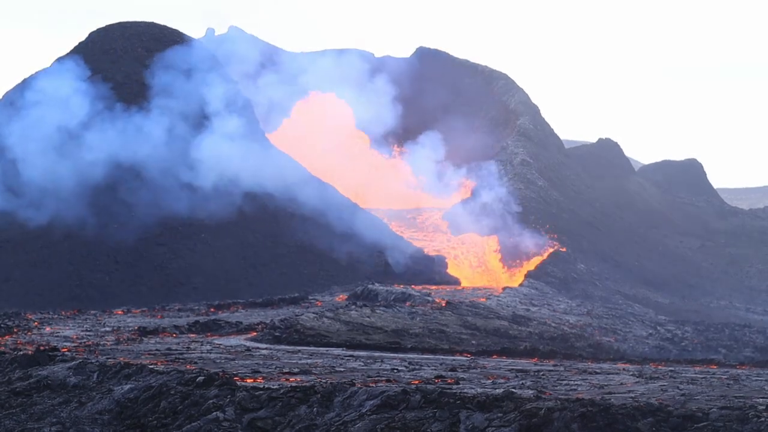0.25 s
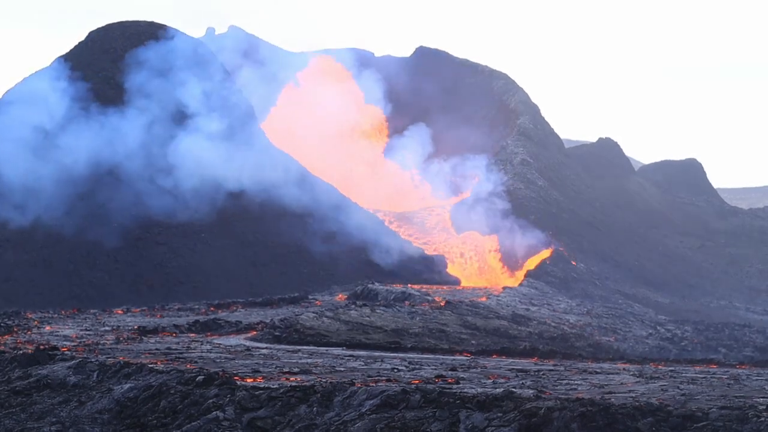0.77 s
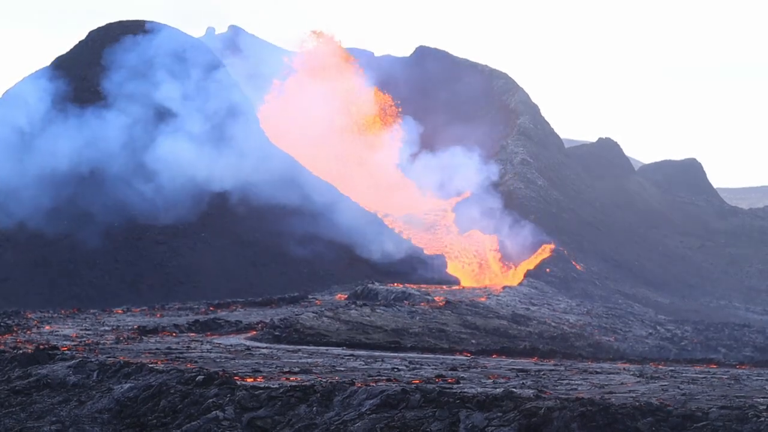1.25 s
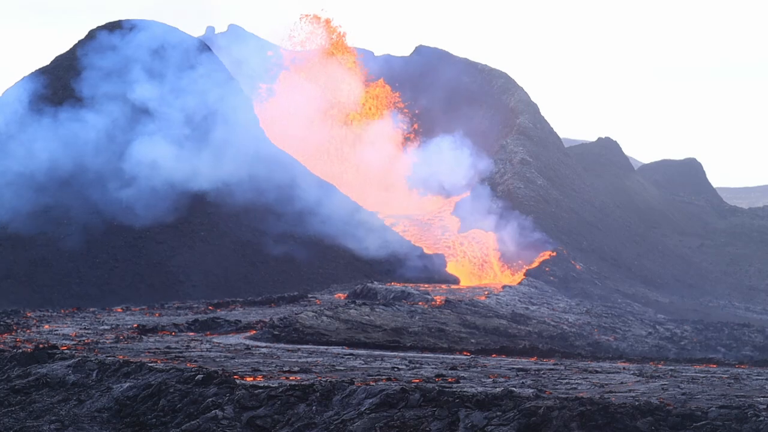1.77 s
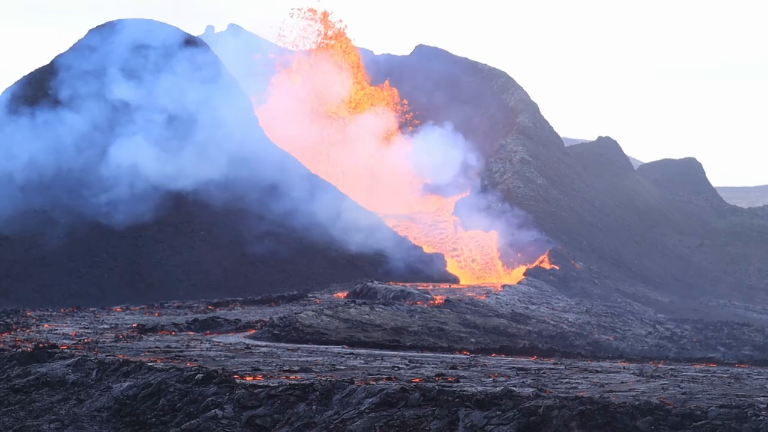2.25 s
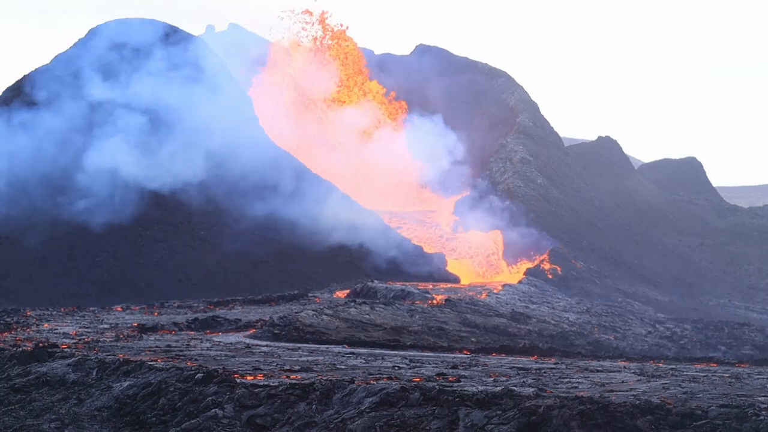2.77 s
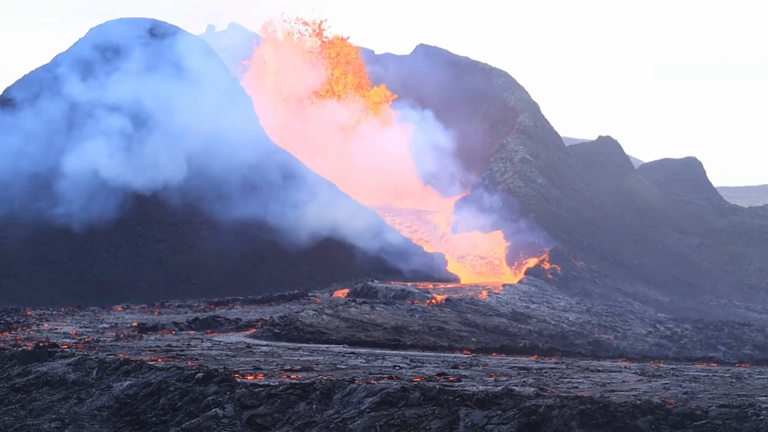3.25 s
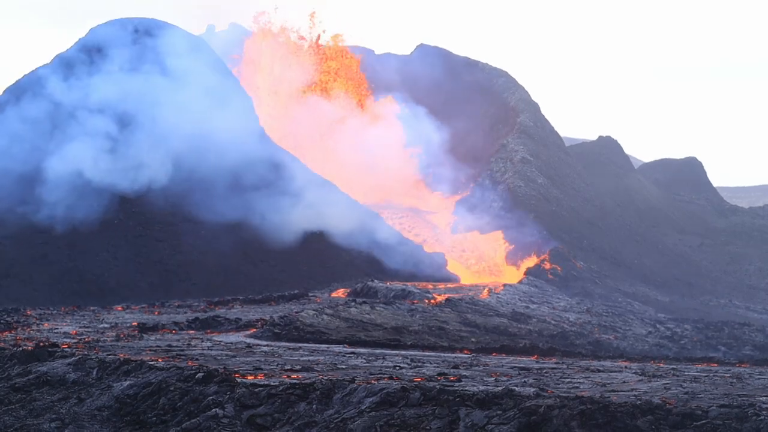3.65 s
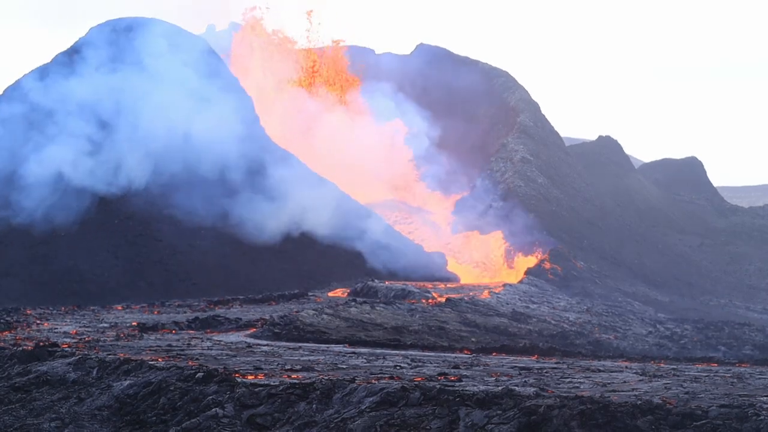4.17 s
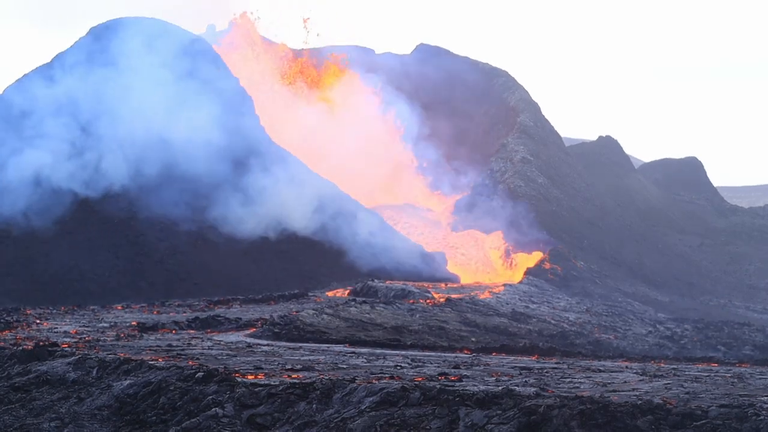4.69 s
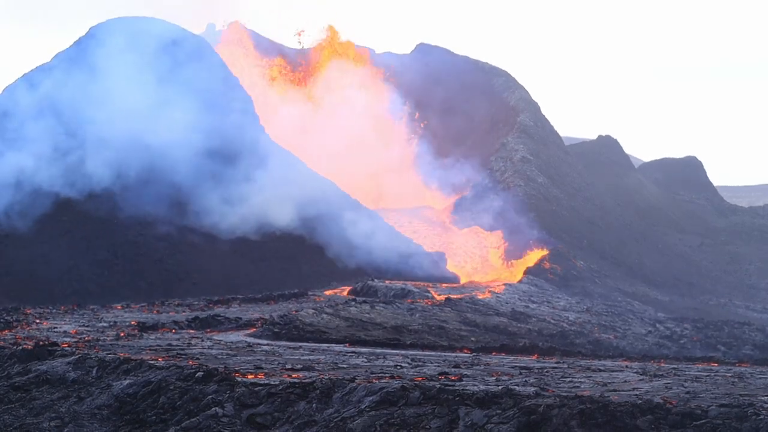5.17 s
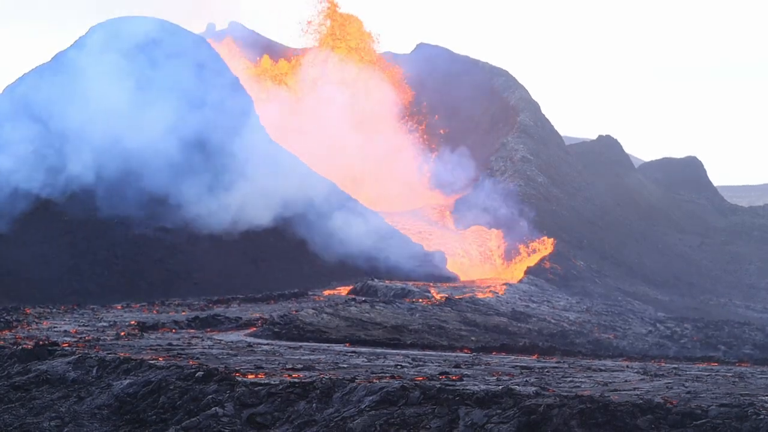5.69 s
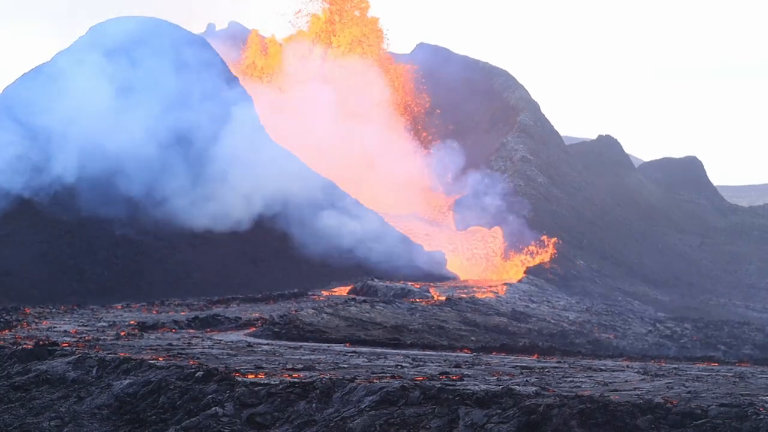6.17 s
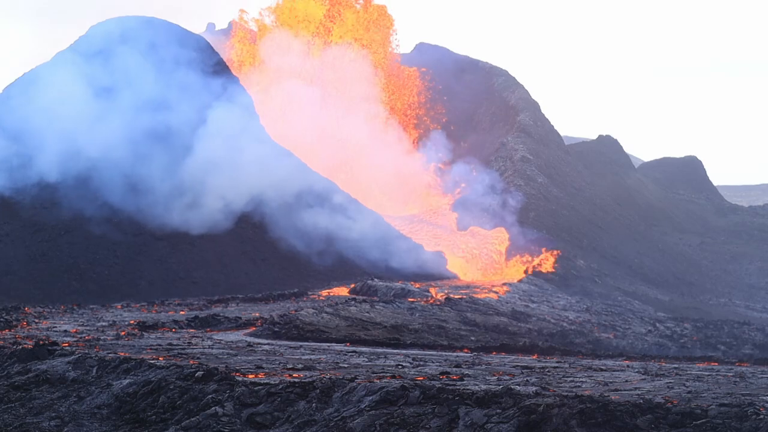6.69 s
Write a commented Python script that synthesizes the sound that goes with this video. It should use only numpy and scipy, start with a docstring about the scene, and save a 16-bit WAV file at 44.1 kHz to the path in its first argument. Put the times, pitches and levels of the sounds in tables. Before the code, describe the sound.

A distant lava fountain booms and rushes outdoors, swelling from quiet to a full steady roar, with early wind buffets and a few near knocks.

```python
"""Distant lava fountain in wind

The gas jet booms and rushes, swelling and then holding; falling clots patter into a dull wash.
All are shaped noise under level curves, with soft low tones added over the boom. Wind noise buffets
the microphone, a thin treble hiss lies on top, and ticks and knocks made of close partials sound nearer.
"""
import sys
import numpy as np
from scipy import signal
from scipy.fft import rfft, irfft, next_fast_len
from scipy.io import wavfile
from scipy.ndimage import uniform_filter1d, map_coordinates

SR = 44100
rng = np.random.default_rng(int(sys.argv[2]) if len(sys.argv) > 2 else 0)


def master(y):
    """Save y as 16-bit WAV."""
    cut = np.clip(np.atleast_2d(y).T, -1, 1)
    pcm = np.round(cut * 32767)  # scale
    wavfile.write(sys.argv[1], SR, pcm.astype(np.int16))


N = 306054  # samples

# Spectra, relative level per Hz: freq_hz, level_db
RUMBLE_SPECTRUM = [(25, -30.5), (45, -11.5), (65, 1), (95, 2.5), (125, -7), (170, -19), (300, -66.5)]
RUSH_SPECTRUM = [(150, -20), (280, -4), (370, 0), (480, -2), (600, -2), (800, -1), (1000, -5.5),
                 (1250, -12.5), (1800, -18), (3000, -46)]
SPATTER_SPECTRUM = [(600, -31), (1100, -4.5), (1700, -5.5), (2100, -9.5), (2800, -13), (3500, -21.5),
                    (4500, -35), (7000, -77)]
SPRAY_SPECTRUM = [(1500, -21), (2800, -13), (3700, -4), (5000, -13), (6500, -30.5), (9000, -50)]
BUFFET_SPECTRUM = [(10, -26), (24, -1), (33, -0.5), (42, 2), (52, 0), (62, -4), (90, -8), (150, -28),
                   (300, -58.5)]
HISS_SPECTRUM = [(2000, -33), (5000, -0.5), (7500, -6), (10000, -7.5), (13000, -9), (16000, -9)]
# Boom spectrum at the middle pitch, before the shift to either band: freq_hz, level_db
BOOM_SPECTRUM = [(60, -34), (100, -11.5), (140, -1.5), (170, 1), (205, -1.5), (260, -10), (400, -30),
                 (800, -64)]

# Fountain levels before short rises and tearing: time_s, rush_db, boom_db, spatter_db, spray_db
JET_LEVELS = [(0, -31.5, -27, -39.5, -61), (.45, -32, -29.5, -43, -62.5), (.95, -33, -31, -42, -59.5),
              (1.6, -28, -28, -37.5, -55), (2.15, -24, -23, -33, -51), (2.55, -21, -16, -31.5, -51),
              (2.75, -20.5, -16, -33, -52.5), (3.0, -21, -17.5, -32.5, -52.5),
              (3.35, -21, -17.5, -33, -52.5), (3.7, -21, -17.5, -34, -52), (4.0, -20, -17, -30.5, -53.5),
              (4.36, -18, -18, -32.5, -56), (4.5, -20, -18, -32, -58), (4.8, -18, -19.5, -31.5, -57),
              (5.15, -17, -18, -31, -56), (5.35, -15.5, -15.5, -27.5, -55), (5.55, -17, -16.5, -27, -56),
              (5.79, -16, -17, -28, -53.5), (5.84, -19, -17.5, -28, -55), (5.92, -17, -19, -30, -55),
              (5.98, -20, -15, -32.5, -56.5), (6.3, -20.5, -20.5, -33, -59.5), (6.55, -20, -20, -32, -59),
              (6.9, -20, -18.5, -34, -58)]
# Short rises in the jet, some slight or none, before each layer's share: time_s, rise_db, sigma_s
JET_RISES = [(2.55, 0.5, 0.03), (4.28, 2, .03), (4.4, 3, 0.066), (4.74, 1, .03), (5.32, 0, 0.044),
             (5.78, 2, 0.012), (5.93, 2.5, 0.015), (6.5, 1, .01)]
# Share of a short rise in each layer: rush_ratio, boom_ratio, spatter_ratio, spray_ratio
JET_RISE_SHARES = [0.56, .6, 0.81, 1.1]
# Quick tearing depth: rush_db, spatter_db, spray_db
TEAR_DEPTHS_DB = [0.57, 0.5, 0.5]
# Deep heaves of the vent that lift the rumble: time_s, rise_db, sigma_s
HEAVES = [(2.32, 4.5, 0.033), (3.85, 9.5, 0.04), (4.04, 4, 0.056), (4.94, 7.5, 0.16), (5.5, 4, 0.17),
          (5.9, 5, 0.05), (6.15, 9, 0.11), (6.4, 11.5, .06), (6.65, 3.5, 0.08), (6.83, 6.5, 0.077)]
# Thumps that roll through the boom: time_s, rise_db, sigma_s
THUMPS = [(2.86, 2, 0.033), (4.28, 2, .03), (4.74, 5, 0.026), (5.0, 2, .03), (5.33, 2.5, 0.023),
          (5.72, 1, .04), (5.96, 3, 0.021), (6.07, -0.5, .03), (6.24, 4.5, 0.023), (6.41, 3.5, .02),
          (6.5, 2, 0.018), (6.69, 3.5, 0.053)]
# Boom pitch drift as the vent mouth opens and chokes: time_s, upper_band_power_share (0-1)
BOOM_DRIFT = [(0, 0.54), (2.2, 0.47), (2.55, 0.87), (2.9, 0.8), (3.1, 0.3), (3.3, 0.8), (3.55, .85),
              (3.7, 0.2), (4.05, 0.53), (4.3, 0.6), (4.7, 0.56), (5.0, .4), (5.3, 0.75), (5.7, 0.57),
              (6.05, 0.32), (6.4, 0.23), (6.6, 0.6), (6.94, 0.4)]
# Soft low sine swells added over the boom noise: time_s, peak_db, pitch_hz, sigma_s
THROBS = [(2.547, -16.5, 215, 0.022), (2.68, -14.5, 195.3, .03), (2.727, -17, 125, .025),
          (3.102, -13.5, 140, 0.033), (3.212, -13.5, 175, 0.027), (3.358, -14, 154.8, 0.024),
          (3.527, -18, 210, 0.027), (3.66, -17, 136, 0.033), (3.802, -12, 150, 0.024),
          (4.41, -13, 175, .03)]

# Brief swells of low wind noise: time_s, peak_db, sigma_s
WIND_SWELLS = [(0.03, -29, 0.054), (0.17, -28, 0.015), (0.238, -27, 0.011), (0.32, -34, 0.031),
               (0.403, -12, 0.0072), (0.58, -17.5, 0.013), (.618, -23, .013), (0.662, -16.5, 0.019),
               (0.712, -19.5, 0.013), (.79, -29, 0.026), (0.86, -29.5, 0.023), (1.136, -27, 0.017),
               (1.286, -32, 0.03), (2.02, -36, 0.044), (2.157, -37.5, 0.024), (2.893, -23, 0.023),
               (3.95, -36, 0.053), (4.225, -29, .04), (4.626, -26, 0.032), (4.924, -37, 0.021),
               (5.48, -33.5, 0.069), (5.98, -35, 0.037), (6.27, -37, 0.069), (6.59, -37.5, 0.031)]
# Slowly changing wind level on the microphone, before flutter: time_s, level_db
BREEZE_LEVEL = [(0, -27), (.45, -30.5), (.8, -32.5), (.95, -34), (1.8, -43.5), (2.7, -29), (4.3, -39),
                (4.8, -48), (6.9, -43)]
# Treble hiss: time_s, level_db
HISS_LEVEL = [(0, -66.5), (.6, -67), (1.7, -60), (2.2, -57.5), (4.35, -58), (4.6, -60), (5.25, -60.5),
              (5.9, -65.5), (6.15, -67)]
# Dry ticks and knocks: time_s, level_db, low_hz, high_hz, top_minus_bottom_db, rise_and_decay_s
TICKS = [(1.7788, -37, 5000, 15500, 5, .0002), (1.7843, -52, 7000, 11000, 0, .0003),
         (2.537, -23, 1950, 4600, -18, 0.002), (2.552, -38, 3000, 4730, -8, .003),
         (2.628, -35, 2800, 5000, -10, .002), (2.646, -34.5, 2800, 3820, -3, 0.0018),
         (3.791, -37, 2390, 4020, -6, .002), (5.77, -15, 500, 614, 1, .006),
         (5.774, -24.5, 1490, 3800, -14, 0.0048), (6.742, -29, 2170, 3760, -16, 0.0018)]

RUMBLE_RE_BOOM_DB, RUMBLE_WOBBLE_DB = -10.5, 0.4
BOOM_SHIFT_RATIO = 1.21  # upper band over middle, middle over lower
FLUTTER_DB, WIND_RUMBLE_RE_BUFFET_DB = 2.5, -5.5
TICK_PHASE_SCATTER_CYCLES = 0.4 * 2 * np.pi
TOP_HZ = 15720


def amp(db):
    """dB to gain."""
    return 10 ** (np.asarray(db) / 20)


def unit(x):
    """Scale to rms 1."""
    return x / np.sqrt(np.mean(x ** 2) + 1e-20)


def curves(rows):
    """Interpolate each column after the time to one value per sample."""
    time_s, *columns = np.transpose(rows)
    return [np.interp(np.arange(N) / SR, time_s, column) for column in columns]


def wobble(rate_hz):
    """Smooth random curve through rate_hz knots a second."""
    knots = rng.standard_normal(int(N * rate_hz / SR) + 4)
    return map_coordinates(knots, [np.arange(N) * rate_hz / SR])


def swells(rows):
    """Sum of bell-shaped swells, rows of time_s, height, sigma_s."""
    coarse_s = np.arange(0, N, 64) / SR
    centre_s, height, sigma_s = np.transpose(rows)[..., None]
    bells = height * np.exp(-0.5 * ((coarse_s - centre_s) / sigma_s) ** 2)
    return np.interp(np.arange(N) / SR, coarse_s, np.sum(bells, axis=0))


def filtered(x, response):
    """Multiply the spectrum of x by a response of frequency."""
    size = next_fast_len(N + 8192)
    freq_hz = np.fft.rfftfreq(size, 1 / SR)
    return irfft(rfft(x, size) * response(freq_hz), size)[..., :N]


def coloured(x, spectrum):
    """Filter x through spectrum points read on a log frequency axis; rms 1."""
    points_hz, points_db = np.transpose(spectrum)

    def response(hz):
        return amp(np.interp(np.log(hz + 1), np.log(points_hz), points_db, -120, -120))

    return unit(filtered(x, response))


def evened(x, span_s, share):
    """Level out a share of x's own slow swells, leaving the quick flutter; rms 1."""
    span = int(span_s * SR)
    power = np.abs(uniform_filter1d(uniform_filter1d(x ** 2, span), span))
    return unit(x / (power + 1e-6) ** (np.clip(share, 0, 1) / 2))


def turbulence(patchy_db):
    """White noise whose gain drifts in patches of time and frequency, as eddies in the air carry it."""
    grid = signal.stft(rng.standard_normal(N), nperseg=1024)[2]
    patches = uniform_filter1d(rng.standard_normal(grid.shape), size=10, axis=0)
    patches = uniform_filter1d(patches, size=8, axis=1)
    return signal.istft(grid * amp(patchy_db * unit(patches)), nperseg=1024)[1][:N]


def patter(count, spread_db):
    """Impacts at random moments; a few are much bigger than the rest."""
    when, size = rng.random((count, 2)).T
    blows = amp(-spread_db * np.log(size + 1e-9)) * rng.choice([-1, 1], count)
    return unit(np.bincount((when * N).astype(int), blows, N))


def drifting_boom():
    """Boom of the vent: two noise bands of one shape, lower and higher, cross-faded."""
    upper_share = np.clip(curves(BOOM_DRIFT)[0], 0, 1)
    low, high = (coloured(turbulence(patchy_db=1.0), np.multiply(BOOM_SPECTRUM, [ratio, 1]))
                 for ratio in (1 / BOOM_SHIFT_RATIO, BOOM_SHIFT_RATIO))
    mix = np.sqrt(1 - upper_share) * low + np.sqrt(upper_share) * high
    return evened(mix, span_s=0.06, share=0.57)


def fountain():
    """Big eddies of the jet rumble and boom, small ones rush; clots and spray landing far off blur."""
    layer_rises_db = np.outer(JET_RISE_SHARES, swells(JET_RISES))
    rush_db, boom_db, spatter_db, spray_db = curves(JET_LEVELS) + layer_rises_db
    rumble_db = boom_db + RUMBLE_RE_BOOM_DB + swells(HEAVES) + RUMBLE_WOBBLE_DB * wobble(8.1)
    surge_db = wobble(7.9)  # gas slugs shake boom, rush, spatter and spray at once
    rush_tear_db, spatter_tear_db, spray_tear_db = np.outer(TEAR_DEPTHS_DB, wobble(30))

    rumble_noise = coloured(rng.standard_normal(N), RUMBLE_SPECTRUM)
    rumble = amp(rumble_db) * evened(rumble_noise, span_s=0.039, share=0.94)

    boom = amp(boom_db + swells(THUMPS) + 0.5 * surge_db) * drifting_boom()

    rush_noise = coloured(turbulence(patchy_db=0.32), RUSH_SPECTRUM)
    rush = amp(rush_db + 0.14 * surge_db + rush_tear_db) * rush_noise

    wash = unit(turbulence(patchy_db=0.1)) + 0.38 * patter(count=6000, spread_db=2.0)
    spatter_gain = amp(spatter_db + 0.32 * surge_db + spatter_tear_db)
    spatter = spatter_gain * coloured(wash, SPATTER_SPECTRUM)

    spray_noise = coloured(turbulence(patchy_db=0.7), SPRAY_SPECTRUM)
    spray = amp(spray_db + 0.55 * surge_db + spray_tear_db) * spray_noise
    return rumble + boom + throbs() + rush + spatter + spray


def wind():
    """Low pressure swings on the microphone; within a swell they are of much the same size."""
    breeze_db, = curves(BREEZE_LEVEL)
    breeze = amp(breeze_db + FLUTTER_DB * wobble(5.9))
    brief = swells([(time_s, amp(peak_db), sigma_s) for time_s, peak_db, sigma_s in WIND_SWELLS])
    deep, higher = (evened(coloured(rng.standard_normal(N), spectrum), span_s=0.061, share=0.7)
                    for spectrum in (BUFFET_SPECTRUM, RUMBLE_SPECTRUM))
    return (breeze + brief) * (deep + amp(WIND_RUMBLE_RE_BUFFET_DB) * higher)


def hiss():
    """Thin treble noise that rises and fades slowly."""
    hiss_db, = curves(HISS_LEVEL)
    return amp(hiss_db) * coloured(turbulence(patchy_db=1.5), HISS_SPECTRUM)


def ticks():
    """Brief bursts of close partials at scattered phases: quick start, short life."""
    out = np.zeros(N + SR)
    t = np.arange(SR // 10) / SR
    place = np.linspace(0, 1, 16)[:, None]  # position of each partial in the band
    phases_cycles = TICK_PHASE_SCATTER_CYCLES * rng.random((len(TICKS), len(place), 1))
    for (time_s, level_db, low_hz, high_hz, tilt_db, rise_s), phase_cycles in zip(TICKS, phases_cycles):
        gains = amp(tilt_db * place)
        partials_hz = low_hz * (high_hz / low_hz) ** place
        partials = gains * np.sin(2 * np.pi * (partials_hz * (t - rise_s) + phase_cycles))
        burst = np.sum(partials, axis=0) / np.linalg.norm(gains)
        envelope = np.e * t / rise_s * np.exp(-t / rise_s)  # peaks at 1 after rise_s
        out[round(time_s * SR):][:len(t)] += amp(level_db) * envelope * burst
    return out[:N]


def throbs():
    """Soft swells of a few low sine cycles, added over the boom noise."""
    t = np.arange(N) / SR
    out = np.zeros(N)
    phases_rad = 2 * np.pi * rng.random(len(THROBS))
    for (time_s, peak_db, pitch_hz, sigma_s), phase_rad in zip(THROBS, phases_rad):
        swell = swells([(time_s, amp(peak_db), sigma_s)])
        out += swell * np.sin(2 * np.pi * pitch_hz * t + phase_rad)
    return out


def scene():
    """Everything reaches one microphone."""
    return (fountain() + wind() + hiss() + ticks())[None]


def record(dry):
    """Keep nothing at or above the band limit."""
    return filtered(dry, lambda hz: hz < TOP_HZ)


dry = scene()
out = record(dry)
master(out)
```